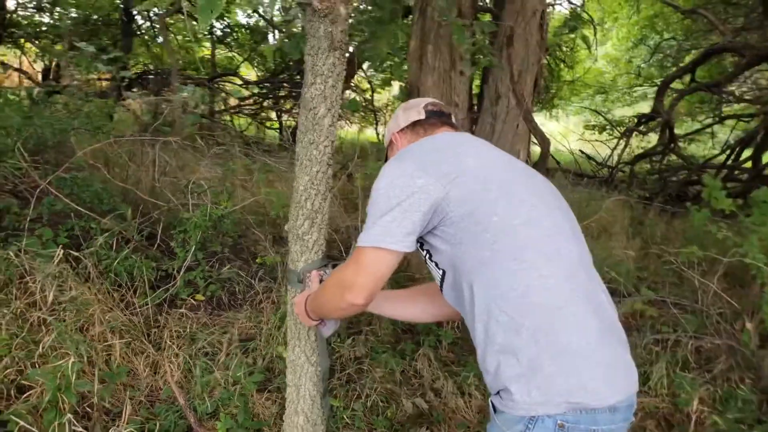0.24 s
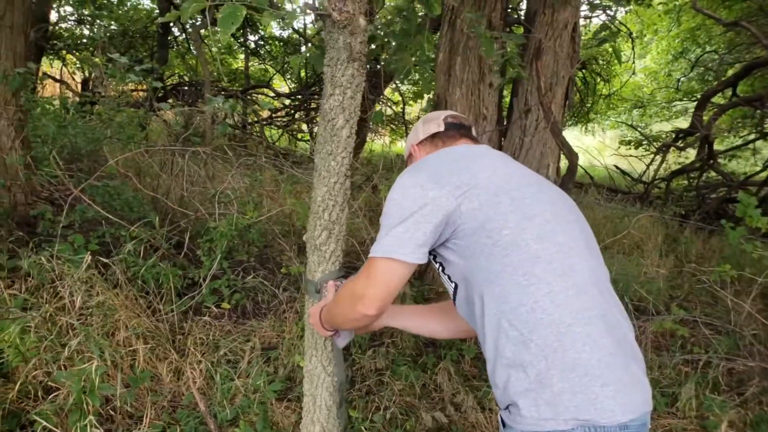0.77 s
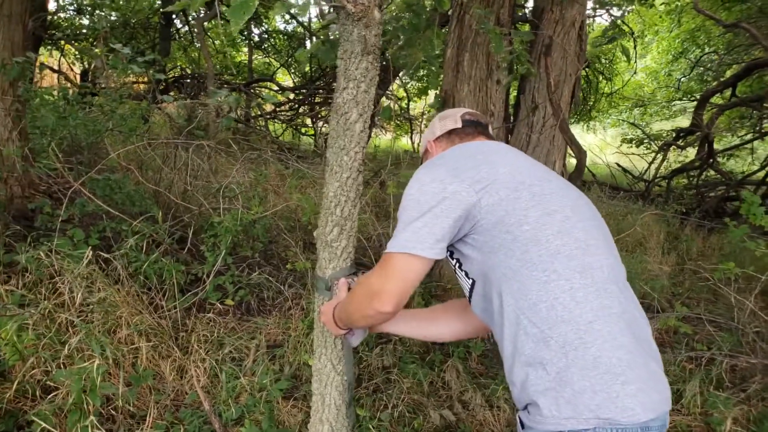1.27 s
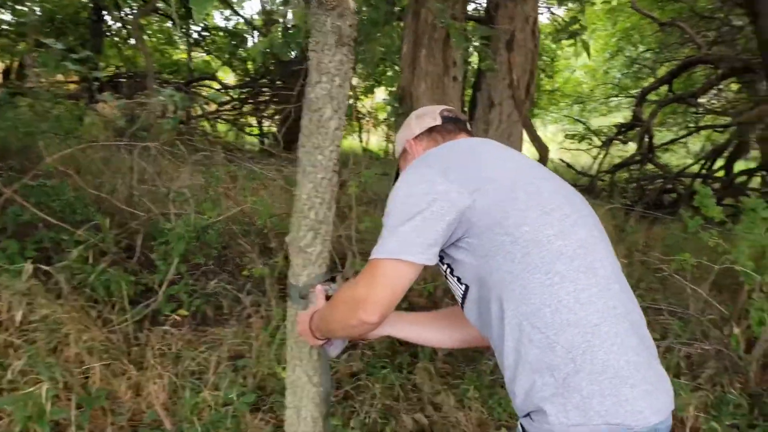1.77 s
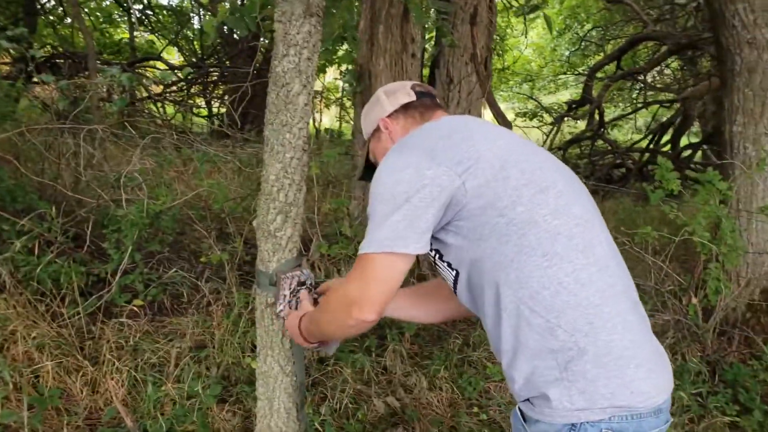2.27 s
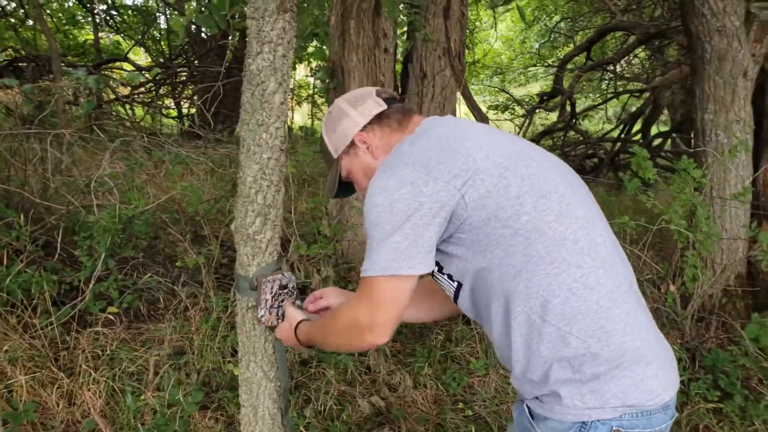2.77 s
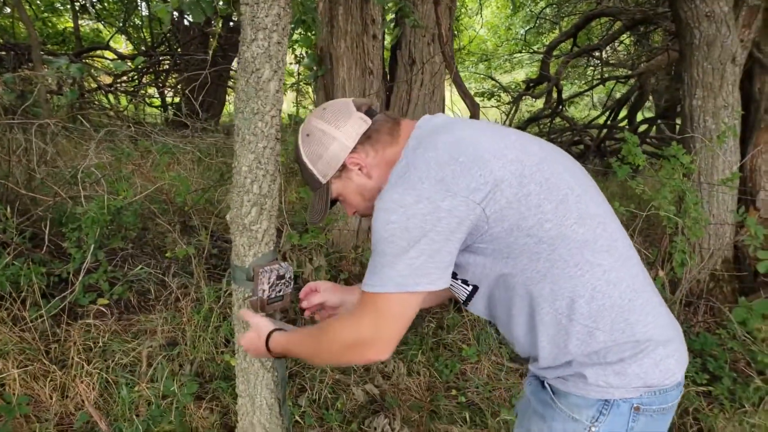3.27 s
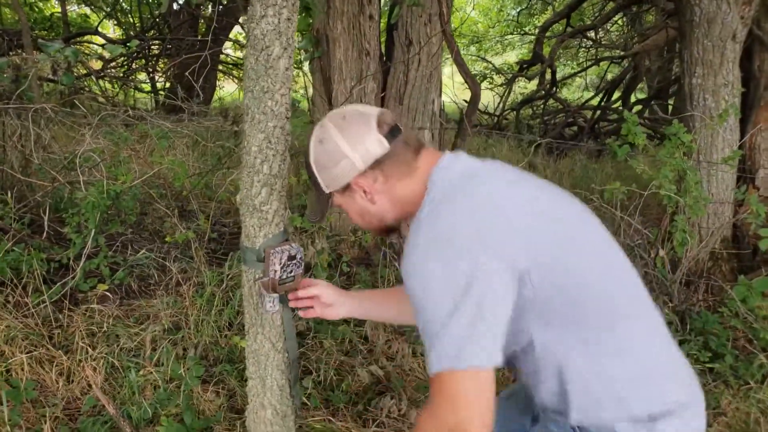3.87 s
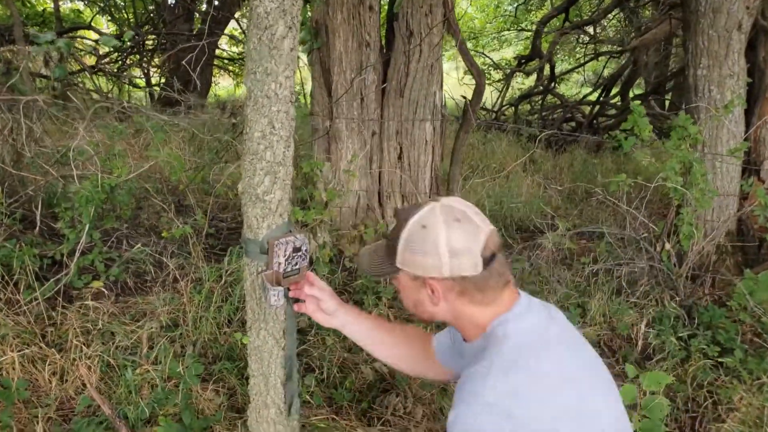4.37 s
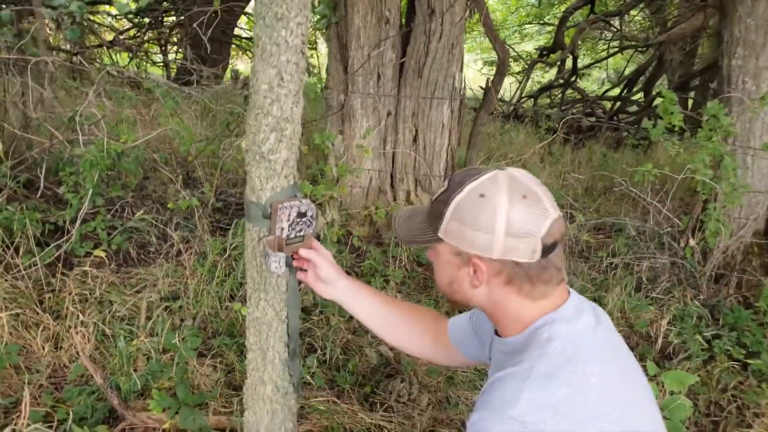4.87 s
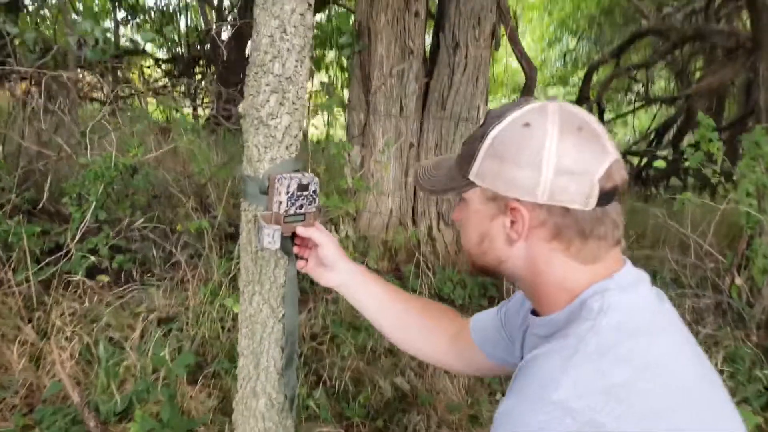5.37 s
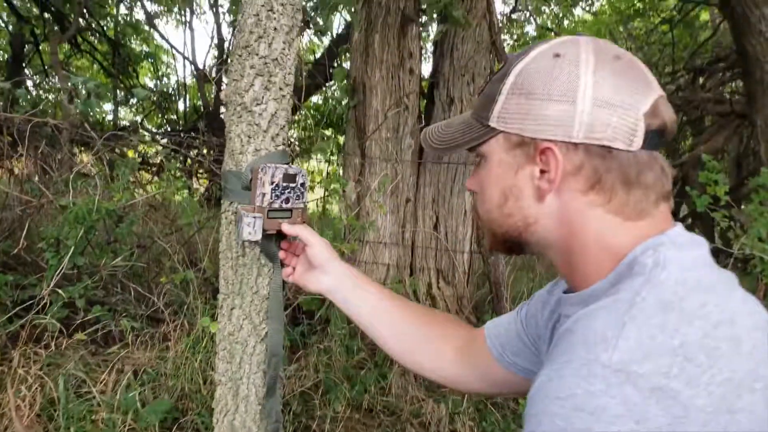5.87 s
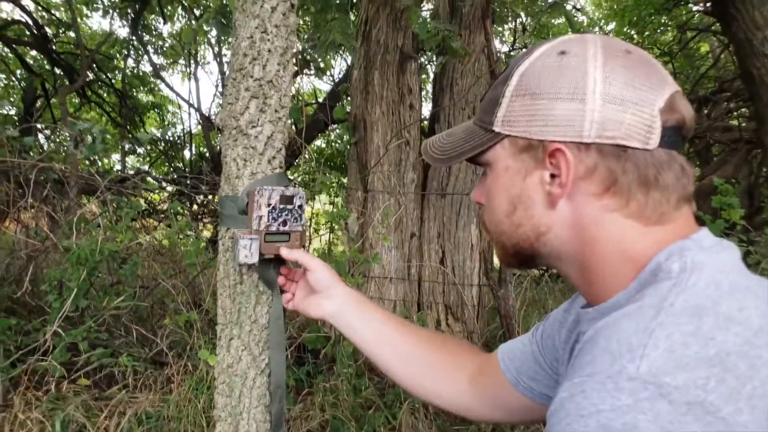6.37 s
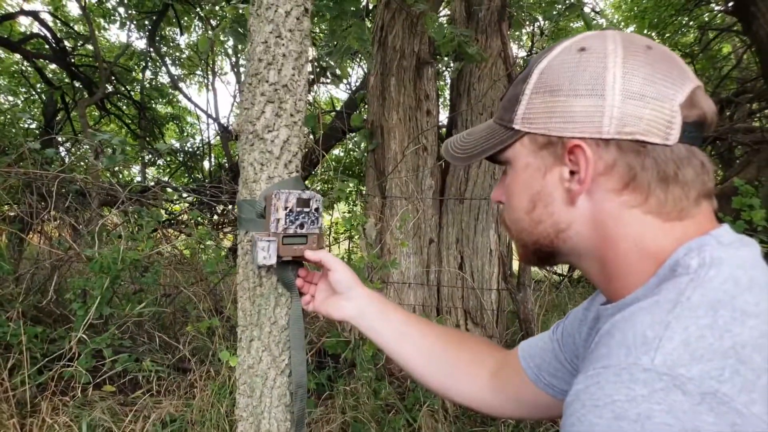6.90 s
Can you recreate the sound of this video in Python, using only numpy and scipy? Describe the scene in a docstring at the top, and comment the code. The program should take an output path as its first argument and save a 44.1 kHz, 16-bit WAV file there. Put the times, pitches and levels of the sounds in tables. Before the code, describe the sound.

Close stereo pickup in open woods. A loud, bright latch snap with a hollow plastic knock starts at once, then a smaller clack about a second later and faint ticks. Hand and cloth rub over bark, a dull step lands on soil, and dry stems crackle with snapping twigs as someone crouches. A final plastic click follows. Crickets chirp about twice a second throughout, over high insect hiss and faint low rumble.

```python
"""A latch snaps and a plastic case knocks open: a man fiddles with a trail camera strapped to a tree.
Each short click is an impulse and a dying chatter, filtered by the modes of trunk, shell and edges.
Rubbing strokes, footfalls, rustling stems and breaking twigs are filtered noise, grains and impulses
as his hand slides down the bark, he steps back and crouches in dry brush.
Crickets chirp as falling tones in the woods, under a hiss of higher insects and a faint far rumble."""
import sys
import numpy as np
from scipy import signal
from scipy.fft import rfft, irfft, next_fast_len
from scipy.io import wavfile
from scipy.ndimage import map_coordinates

SR = 44100
rng = np.random.default_rng(int(sys.argv[2]) if len(sys.argv) > 2 else 0)


def inscribe(sig):
    """Save sig as 16-bit PCM at rate SR to the path in sys.argv[1].

    A 1-D sig is mono; a 2-D sig holds one channel per row.
    Samples are clipped to [-1, 1] before scaling.
    """
    pcm = np.round(np.clip(np.atleast_2d(sig).T, -1, 1) * 32767)
    wavfile.write(sys.argv[1], SR, pcm.astype(np.int16))


N = 314874
TIME_S = np.arange(N) / SR


def amp(db):
    """Decibel law: 20 dB is a factor of ten in amplitude."""
    return 10 ** (np.asarray(db) / 20)


def unit(x):
    """Normalisation to an rms of 1."""
    return x / np.sqrt(np.mean(x ** 2) + 1e-20)


def pan(left_db):
    """Interaural level difference: left and right gains that differ by left_db."""
    return amp([[left_db / 2], [-left_db / 2]])


def along(points, hz):
    """Interpolation of (Hz, value) points on a logarithmic frequency axis."""
    point_hz, value = np.transpose(points)
    return np.interp(np.log(hz + 1), np.log(point_hz), value)


def curves(rows):
    """Interpolation in time: one curve for each column after the time."""
    s, *columns = np.transpose(rows)
    return [np.interp(TIME_S, s, column) for column in columns]


def wobble(rate):
    """Slow random modulation: a smooth curve through rate random knots a second."""
    knots = rng.standard_normal(int(N * rate / SR) + 4)
    return map_coordinates(knots, [np.arange(N) * rate / SR])


def filtered(x, response):
    """Linear filtering: the spectrum times a complex response of frequency."""
    n = x.shape[-1]
    padded = next_fast_len(n + SR // 10)
    spectrum = rfft(x, padded) * response(np.fft.rfftfreq(padded, 1 / SR))
    return irfft(spectrum, padded)[..., :n]


def resonances(modes, f):
    """Modal superposition: causal resonators (Hz, width Hz, dB) summed with alternating sign."""
    total = 0
    for k, (centre, width, db) in enumerate(modes):
        damping = 1j * f * width
        total = total + (-1) ** k * amp(db) * damping / (centre * centre - f * f + damping)
    return total


def coloured(pair, spectrum, alike):
    """Partial coherence: mixing two unrelated signals as mid and side sets the left-right likeness."""
    def response(hz):
        turn = np.arccos(np.clip(along(alike, hz), -1, 1)) / 2
        return amp(along(spectrum, hz)) * [np.cos(turn), np.sin(turn)]
    mid, side = filtered(pair, response)
    return unit(np.array([mid + side, mid - side]))


def crackle(rate, spread_db, smooth):
    """Fracture noise: random bursts of uneven size, decaying over a millisecond, on steady friction."""
    sizes = amp(spread_db * np.minimum(rng.exponential(size=N), np.pi))
    sizes = sizes * (rng.random(N) < rate / SR)
    bursts = signal.lfilter([1], [1, -np.exp(-1000 / SR)], sizes)
    return (unit(bursts) + smooth) * rng.standard_normal((2, N))


# Decay of the diffuse tail among trunks and leaves: pitch_hz, t60_s
WOODS_DECAY = [(200, 0.098), (2000, 0.42), (12000, 0.024)]


def woods(x):
    """Diffuse reverberation: trunks and leaves scatter a sound into a short tail."""
    hz, t, z = signal.stft(rng.standard_normal((2, SR // 2)), SR, nperseg=256)
    decay = amp(-60 * t / along(WOODS_DECAY, hz)[:, None])
    tail = signal.istft(z * decay, SR, nperseg=256)[1]
    return signal.fftconvolve(np.atleast_2d(x), tail / np.linalg.norm(tail[0]), axes=1)[:, :N]


def through_brush(x):
    """Multipath: stems and leaves add 18 early copies that blur a sound differently on each side."""
    delays_s = 0.026 * rng.random((2, 18, 1)) ** 1.5
    signs = rng.choice([-1, 1], (2, 18, 1))
    taps = (0.17 * signs * (np.arange(SR // 20) == np.round(delays_s * SR))).sum(1)
    taps[:, 0] += 1  # the direct path
    taps = taps / np.linalg.norm(taps, axis=1, keepdims=True)
    return signal.fftconvolve(x[None], taps, axes=1)[:, :N]


def contact(t60, chatter, apart):
    """Impact excitation: an impulse, then a dying chatter of loose parts; apart unlinks the two sides."""
    t = np.arange(SR // 10) / SR
    noise = rng.standard_normal(len(t)) + apart * rng.standard_normal((2, len(t)))
    noise *= amp(-60 * t / t60)
    return (t == 0) + chatter * t60 * noise


def at_level(x, db):
    """Onset level: scale a click so that its first 5 ms have this rms."""
    return amp(db) * x / np.sqrt(np.mean(x[:, :SR // 200] ** 2))


NOTE_S = 0.03  # one wing stroke
PULSE_CLIMB = 0.004  # share by which the mean starting pitch rises from pulse to pulse


def chirping(chirps, pulses):
    """Stridulation: every wing stroke is a short tone that falls in pitch as the wings slow down."""
    out = np.zeros(N + 2 * SR)
    u = np.arange(int(NOTE_S * SR)) / (NOTE_S * SR)
    places = np.arange(len(pulses)) - (len(pulses) - 1) / 2  # counted from the middle of the chirp
    for s, hz, db, spacing, fall in chirps:
        for k, pulse_db in zip(places, pulses):
            detune, size = rng.standard_normal(2)
            pitch = hz * (1 + PULSE_CLIMB * k + 0.0014 * detune - fall * u ** 1.64)
            tone = np.sqrt(2) * np.sin(np.pi * u) * np.sin(2 * np.pi * np.cumsum(pitch) / SR)
            start = SR + int((s + k * spacing - NOTE_S / 2) * SR)
            out[start:][:len(u)] += amp(db + pulse_db + 1.2 * size) * tone
    return out[SR:SR + N]


# Katydid level over time: time_s, relative_level_db
KATYDID_LEVEL = [(0.15, -61), (0.36, -62), (1.06, -58.5), (1.3, -55.5), (2.17, -61), (4.61, -59),
                 (4.94, -56.5), (7.14, -63.5)]
# Katydid spectrum: pitch_hz, relative_density_db_per_hz
KATYDID_COLOUR = [(8800, -14.5), (9900, -6.5), (10800, 2.5), (12500, 4), (13900, 2), (15600, 2)]
# Far, blended insects as humps of hiss: centre_hz, width_hz, relative_level_db
FAR_INSECT_HUMPS = [(4300, 1300, -5), (5590, 445, -4), (7580, 1100, 0.5), (8350, 74, -9.5)]


def insects(katydid_db=4.0, far_db=-61):
    """Band-limited noise: rasping katydids that swell and sink, over blended trills far away."""
    rasp = coloured(crackle(5000, 2.9, smooth=0.86), KATYDID_COLOUR, [(10000, 0.017)])
    katydids = amp(curves(KATYDID_LEVEL)[0] + katydid_db + 1.6 * wobble(3.4)) * rasp

    def humps(f):
        return sum(amp(db) * np.exp(-2 * ((f - hz) / width) ** 2) for hz, width, db in FAR_INSECT_HUMPS)
    trills = unit(filtered(rng.standard_normal((2, N)), humps))
    far = amp(far_db + 1.48 * wobble(25)) * trills
    return katydids * pan(-0.84) + far * pan(-0.68)


# Spectrum of the hush: pitch_hz, relative_density_db_per_hz
HUSH_COLOUR = [(25, -20), (65, -0.5), (103, 3.5), (150, -8.5), (250, -11.5), (600, -12.5), (3000, -17),
               (9000, -34.5), (16000, -37)]
# Coherence of the hush: pitch_hz, left_right_likeness
HUSH_ALIKE = [(40, 0.29), (120, 0.93), (600, 0.045), (3000, 0.086)]
# Soft low buffets: centre_s, level_db, half_length_s
BUFFETS = [(1.692, -63, 0.016), (4.437, -72, 0.14), (5.02, -66.5, 0.072), (5.476, -68.5, 0.089),
           (6.055, -73, 0.062)]
HUSH_WAVER_DB = 1.8
RUMBLE_DB = -80.5  # floor under the buffets


def air(db=-71.0):
    """Broadband and low-frequency noise: the wavering hush of leaves, a faint rumble and soft buffets."""
    hush = coloured(rng.standard_normal((2, N)), HUSH_COLOUR, HUSH_ALIKE)
    hush = amp(db + HUSH_WAVER_DB * wobble(5.1)) * hush
    low_colour = [(25, -2.5), (50, 0.0), (90, -6.0), (200, -17.0), (600, -79.0)]  # Hz, relative dB per Hz
    low = coloured(rng.standard_normal((2, N)), low_colour, [(50, 0.43)])
    swells = sum(amp(level) * np.exp(-((TIME_S - s) / half) ** 2) for s, level, half in BUFFETS)
    return hush + (amp(RUMBLE_DB) + swells) * amp(1.0 * wobble(7.7)) * low


CROWD_LOW_HZ, CROWD_SPAN_HZ = 4100, 850
CROWD_SWELL_DB, CROWD_SWELL_S = 6, 0.12


def crowd(db=-66, count=260):
    """Incoherent superposition: far crickets blur into a buzz that swells around each leader call."""
    when, pitch, size, pace = rng.random((4, count))
    s = (np.arange(count) + when) / count * N / SR
    hz = CROWD_LOW_HZ + CROWD_SPAN_HZ * (pitch + rng.random(count)) / 2
    song = chirping(np.transpose([s, hz, 5 * size, 0.04 + 0.02 * pace, 0.06 * size]), OTHER_PULSES)
    swell = sum(np.exp(-((TIME_S - call) / CROWD_SWELL_S) ** 2) for call, *_ in LEADER)
    buzz = unit(woods(song) / 2 + through_brush(song))
    return amp(db + CROWD_SWELL_DB * swell) * buzz * pan(-8)


# Short hard clicks, case contacts and some dry snaps as he crouches: start_s, knock_level_db,
# knock_centre_hz, shell_level_db, shell_centre_hz, shell_bandwidth_per_centre (ratio), tick_level_db
CLICKS = [(0.0058, -31.5, 797, -25.5, 2580, 2.4, -20.5), (0.0101, -48, 810, -50, 3000, 2.9, -46),
          (0.0192, -46.5, 636, -24.5, 2240, 0.82, -22.5), (0.073, -55, 710, -30.5, 4100, 0.32, -58),
          (0.1073, -50, 760, -45, 2200, 0.76, -56), (1.185, -42.5, 1320, -38, 2200, 0.33, -48),
          (1.2022, -37.5, 1300, -36, 2300, 1.7, -46), (1.203, -46.5, 596, -40, 2020, 1.3, -54),
          (1.2052, -54, 290, -32, 2680, 1.1, -45), (1.213, -47, 1300, -47, 1800, 0.82, -62),
          (1.398, -62.5, 447, -32.5, 3050, 2.8, -34.5), (1.4921, -66, 403, -43, 3260, 0.57, -48),
          (1.56, -71, 500, -56, 1880, 2.1, -49), (1.633, -71, 704, -60, 1520, 0.51, -64),
          (1.65, -53.5, 820, -44, 3360, 2.4, -50), (1.658, -64, 756, -57, 1590, 1.3, -61),
          (1.742, -57.5, 850, -51.5, 2300, 1.4, -66), (1.8728, -69, 550, -50.5, 2440, 1.1, -65),
          (1.9504, -56, 750, -45.5, 2410, 0.94, -54), (1.973, -70, 700, -49.5, 3180, 1.1, -62),
          (2.243, -72, 795, -66.5, 1800, 0.7, -72), (2.677, -77, 550, -52, 2120, 0.71, -70),
          (2.9288, -78, 990, -50.5, 4520, 1.9, -58), (4.764, -79, 950, -42.5, 3880, 1.3, -42),
          (4.7967, -90, 746, -39.5, 3020, 1.1, -42), (4.842, -87, 950, -29, 3750, 0.71, -41.5),
          (4.8402, -88, 500, -40.5, 2110, 0.13, -35), (5.8545, -81, 448, -26, 3880, 1.05, -71),
          (6.2444, -73, 496, -43, 1950, 0.34, -53), (6.25, -85, 800, -45, 3000, 1.1, -47),
          (6.2579, -47.5, 1010, -28, 2300, 1.6, -39), (6.2775, -72, 800, -53, 3500, 1.3, -47),
          (6.2883, -60, 1040, -44, 3800, 0.69, -37), (6.473, -67.5, 810, -70, 1500, 1, -72),
          (6.503, -79, 750, -52.5, 3000, 2.2, -74)]
# Modes of the case: centre_hz, width_hz, gain_db
CASE = [(1036, 73.5, -26), (1372, 240, 8.5), (1950, 460, -2.5), (2300, 304, -11.5), (3000, 120, -8.5),
        (4020, 59, -36), (3880, 950, 8.5), (4860, 450, 17), (5490, 1000, 5.5)]
# Modes of the case knocking against the trunk: centre_hz, width_hz, gain_db
KNOCK = [(296, 41, 20.5), (633, 100, 13), (820, 180, 8.5), (1023, 260, 11), (1306, 74, 17)]
# Modes of the small hard edges of latch and switches: centre_hz, width_hz, gain_db
EDGES = [(8230, 1600, 0.5), (10680, 520, 5.5), (12340, 1900, 8), (15900, 870, -19)]
LONGEST_RING_S = 0.04  # the hand damps the case
RING_CYCLES = 77.4  # the chatter dies by 60 dB within this many cycles of its shell centre


def clicks(plate=1.0, lag_ms=0.11):
    """Impact on modes: every click, dry snaps too, sums a trunk knock, a shell ring and an edge tick."""
    out = np.zeros((2, N + SR))
    for s, knock_db, knock_hz, shell_db, hz, breadth, tick_db in CLICKS:
        t60 = min(RING_CYCLES / hz, LONGEST_RING_S)

        def shell_modes(f):
            return (plate + resonances(CASE, f)) * resonances([(hz, breadth * hz, 0)], f) ** 2

        def knock_modes(f):
            return resonances(KNOCK, f) * resonances([(knock_hz, knock_hz / 2, 0)], f) ** 2
        shell = filtered(contact(t60, chatter=2.5, apart=1), shell_modes)
        knock = filtered(contact(t60, chatter=1.2, apart=0)[:1], knock_modes)
        tick = filtered(contact(t60, chatter=2.2, apart=1.8), lambda f: resonances(EDGES, f))
        click = at_level(knock, knock_db) + at_level(shell, shell_db) * pan(-2.5)
        click = click + at_level(tick, tick_db) * pan(1.57)
        out[:, int(s * SR):][:, :click.shape[1]] += click
    # half the lag delays the left and half advances the right, so the right hears it first
    sides = np.array([[1], [-1]])
    return filtered(out[:, :N], lambda f: np.exp(-1j * np.pi * f * lag_ms / 1000 * sides))


# The shiver after the first snap, one row: start_s, level_db, t60_s
SHIVER = (0.0095, -26.5, 0.28)
# Spectrum of the shiver: pitch_hz, relative_density_db_per_hz
SHIVER_COLOUR = [(88, -39), (170, -15), (450, -3), (796, -5), (1220, -9.5), (1570, -0.5), (2060, -8),
                 (4650, -0.5), (5330, -2), (9540, -4.5), (10900, -2), (15500, -1.5)]
# Tones of the latch: pitch_hz, peak_level_db, t60_s
LATCH_RING = [(848, -29, 0.072), (1005, -41.5, 0.1)]
# Coherence of nearby sounds, shared with brush and rubbing: pitch_hz, left_right_likeness
NEAR_ALIKE = [(200, 0.99), (1200, 0.253), (3000, 0.0394), (7000, 0.18)]


def shiver():
    """Exponential decay: the first hard snap rings the latch and leaves a bright, quickly dying hiss."""
    s, db, t60 = SHIVER
    age = TIME_S - s
    hiss = coloured(rng.standard_normal((2, N)), SHIVER_COLOUR, NEAR_ALIKE)
    hiss = amp(db - 60 * np.abs(age) / t60) * hiss * pan(0.87)
    ring = sum(amp(level - 60 * np.abs(age) / life) * np.sin(2 * np.pi * hz * age)
               for hz, level, life in LATCH_RING)
    return (age > 0) * (hiss + ring)


# Nearest cricket, calling about twice a second: chirp_middle_s, relative_level_db, pitch_hz (at the
# start of a pulse), pitch_fall (share over a pulse)
LEADER = [(0.109, -55, 4920, 0.061), (0.552, -57.5, 4940, 0.061), (1.116, -55.5, 4920, 0.046),
          (1.515, -53, 4930, 0.042), (1.975, -57.5, 4900, 0.034), (2.438, -54.5, 4940, 0.049),
          (2.947, -56, 4920, 0.02), (3.425, -54, 4930, 0.046), (3.904, -52.5, 4900, 0.031),
          (4.421, -57, 4940, 0.059), (4.859, -58, 4900, 0.056), (5.361, -60, 4890, 0.017),
          (5.77, -58, 4890, 0.027), (6.147, -53.5, 4890, 0.017), (6.589, -54, 4880, 0.008),
          (7.027, -53.5, 4900, 0.0071)]
# Neighbours chirping around each of its chirps: pitch_hz (mean start), relative_level_db (mean),
# offset_s (mean, negative is earlier)
NEIGHBOURS = [(4830, -75.5, 0.01), (4720, -71, -0.01), (4370, -70.5, -0.08), (4220, -68.5, 0.04),
              (4010, -70, 0.046)]
# Quicker, nearly level chirps out of step with them: chirp_middle_s, pitch_hz, relative_level_db
STRAYS = [(0.25, 4270, -66.5), (0.834, 4260, -71), (1.8, 4820, -69), (2, 4230, -66), (2.349, 4400, -72),
          (2.54, 4210, -83), (2.73, 4820, -70.5), (2.822, 4380, -70), (3.331, 4230, -63.5),
          (3.522, 4220, -64), (3.68, 4810, -65.5), (4.07, 4255, -65), (4.32, 4170, -62), (4.36, 4560, -63),
          (4.65, 4830, -67), (4.68, 4260, -64), (5.532, 4330, -67), (6.3, 4275, -61), (6.51, 4845, -65.5),
          (6.669, 4200, -67), (6.859, 4840, -66)]
NEIGHBOUR_PULSE_S, NEIGHBOUR_FALL = 0.05, 0.051  # mean pulse spacing, share of pitch lost
NEIGHBOUR_SCATTER_S, NEIGHBOUR_SCATTER_DB = 0.025, 1.5
STRAY_PULSE_S, STRAY_FALL = 0.033, 0.023


def other_chirps():
    """Loose synchrony: neighbours chirp around each leader call, while strays keep their own time."""
    chirps = []
    for s, *_ in LEADER:
        for hz, db, offset in NEIGHBOURS:
            slip, size, detune, pace = rng.standard_normal(4)
            middle = s + offset + NEIGHBOUR_SCATTER_S * slip
            level = db + NEIGHBOUR_SCATTER_DB * size
            spacing = NEIGHBOUR_PULSE_S * (1 + 0.12 * pace)
            chirps.append((middle, hz * (1 + 0.006 * detune), level, spacing, NEIGHBOUR_FALL))
    return chirps + [(s, hz, db, STRAY_PULSE_S, STRAY_FALL) for s, hz, db in STRAYS]


# Successive pulses of a leader chirp: relative_level_db
LEADER_PULSES = [-1.5, 0.69, 0]
# Successive pulses of every other chirp, near or far: relative_level_db
OTHER_PULSES = [1, 6.5, 8.5, 7.5]
LEADER_PULSE_S = 0.0535  # time from pulse to pulse


def crickets(direct_db=-2.1):
    """Direct and scattered sound: near crickets chirp through the brush and the trees smear their pulses."""
    calls = [(s, hz, db, LEADER_PULSE_S, fall) for s, db, hz, fall in LEADER]
    leader = chirping(calls, LEADER_PULSES)
    others = chirping(other_chirps(), OTHER_PULSES)
    direct = amp(direct_db) * through_brush(leader + others)
    scattered = woods(amp(-11) * leader + amp(-9) * others)
    return (direct + scattered) * pan(-1.3)


def splinters(count=9000, hz=2700, cycles=12):
    """Granular fracture: fine stems break at random moments, each with its own size, side and brief pitch."""
    when, size, side = rng.random((3, count, 1))
    pitch = np.clip(hz * np.exp(0.4 * rng.standard_normal((count, 1))), 800, 9000)
    k = np.arange(SR // 100)
    turns = pitch * k / SR
    grains = pitch * amp(15 * size ** 4 - 60 * turns / cycles) * np.sin(2 * np.pi * turns)
    where = ((when * N).astype(int) + k).ravel()
    sides = [np.bincount(where, (gain * grains).ravel(), N)[:N] for gain in (side, 1 - side)]
    return unit(np.array(sides))


# Shifts of his weight: peak_s, relative_level_db, rise_s, settling_db_per_s
SHIFTS = [(0.62, -74.5, 0.047, 27), (0.74, -69, 0.2, 64), (1.29, -65, 0.21, 31), (1.99, -73, 0.28, 113),
          (3.8, -67.5, 0.028, 30), (4.57, -69.5, 0.19, 15), (4.96, -64, 0.1, 4.5)]
# Spectrum of the dry stems: pitch_hz, relative_density_db_per_hz
LEAVES = [(88, -49), (150, -40), (722, -13.5), (844, -21), (2920, 2), (4650, -4.5), (6230, -11),
          (7560, -15), (9180, -5), (12300, -50), (15500, -39)]
SETTLED_S, STILL_DB_PER_S = 5.88, 60  # once he is down in the crouch the stems come to rest
UNEVEN_DB = 2.2  # level flutter of the rustle, and of a fully rough rubbing stroke


def brush(rustle_db=8.0):
    """Friction and fracture: dry stems crackle as each shift of his weight builds up, then settle."""
    rustle = coloured(crackle(600, 2.5, smooth=1.8), LEAVES, NEAR_ALIKE)
    stems = unit(rustle + amp(-0.5) * splinters())
    shifts = []
    for s, db, rise, settling in SHIFTS:
        decay = amp(db - settling * np.maximum(TIME_S - s, 0))
        shifts.append(decay * np.exp(-(np.minimum(TIME_S - s, 0) / rise) ** 2))
    resting_db = -STILL_DB_PER_S * np.maximum(TIME_S - SETTLED_S, 0)
    level = amp(rustle_db + resting_db + UNEVEN_DB * wobble(25))
    return np.linalg.norm(shifts, axis=0) * level * stems * pan(-2.8)  # shifts add in power


# Rubbing strokes: start_s, length_s, level_db, centre_hz, resonance_db, treble_db (limit of a
# high shelf), roughness (0-1)
STROKES = [(1.199, 0.089, -50.5, 2620, -14, -16, 0.5), (3.24, 0.21, -46.5, 1660, -1, 2.5, 0.08),
           (3.338, 0.088, -52.5, 2000, -10, 20, 0.3), (3.6, 0.27, -51.5, 1960, 17, 3, 0.2),
           (4.843, 0.11, -52, 3000, -10, -4, 0.4), (5.149, 0.074, -48.5, 2200, 18, -11, 0.2)]
# Spectrum of a rub before its treble shelf: pitch_hz, relative_density_db_per_hz
RUB = [(200, -18.5), (900, -9), (1400, 1.5), (3000, 4.5), (6000, -2.5), (9500, -3.5), (12000, 3),
       (15500, -6)]


def rubbing():
    """Stick-slip friction: hand and clothes slide over bark and strap; rough strokes catch and crackle."""
    out = np.zeros((2, N))
    for s, length, db, hz, focus_db, treble_db, rough in STROKES:
        swell = np.abs(np.sin(np.pi * np.clip((TIME_S - s) / length, 0, 1))) ** 1.3
        spectrum = [(f, level + treble_db * f / (f + 4000)) for f, level in RUB]
        grains = coloured(crackle(1100, 3, smooth=3 * (1 - rough) ** 2), spectrum, NEAR_ALIKE)
        rub = unit(filtered(grains, lambda f: 7.5 + resonances([(hz, hz / 4, focus_db)], f)))
        out += amp(db + rough * UNEVEN_DB * wobble(90)) * swell * rub
    return out * pan(-0.79)


# Heel and sole landing, then pressing in for the crouch: start_s, level_db, dull_above_hz
STEP = [(3.7796, -57.5, 330), (3.793, -50, 900), (3.8029, -50, 700), (3.822, -56.5, 1200),
        (4.904, -68, 1200), (4.943, -61, 1500), (5.02, -72, 1000)]
# Modes of the soil under the foot: centre_hz, width_hz, gain_db
SOIL = [(121, 64, -1), (210, 110, 1.5), (327, 73, 7), (576, 96, 1), (810, 61, 11.5), (2200, 13000, -7)]


def footfall(drag_db=-69, drag_hz=300):
    """Damped impact: the shoe drags briefly, then heel and sole thud on soil with a set treble cutoff."""
    def ground(x, hz):
        return filtered(x, lambda f: resonances(SOIL, f) / (1 + 1j * f / hz) ** 2)
    drag = np.exp(-((TIME_S - STEP[0][0] + 0.059) / 0.095) ** 2)  # centred before the first landing
    out = amp(drag_db) * drag * unit(ground(rng.standard_normal((1, N)), drag_hz))
    for s, db, hz in STEP:
        thud = at_level(ground(contact(0.05, chatter=2, apart=0)[:1], hz), db)
        out[:, int(s * SR):][:, :thud.shape[1]] += thud
    return out * pan(-2.3)


# Twigs that snap as he crouches, the thick ones lowest: start_s, level_db, pitch_hz
TWIGS = [(4.4197, -57, 3000), (4.726, -57, 1050), (4.88, -52, 3320), (4.927, -67, 1020), (4.946, -53, 2380),
         (4.9909, -37.5, 2900), (5.0687, -50, 3500), (5.069, -57, 980), (5.091, -58.5, 664),
         (5.109, -54, 2990), (5.156, -46, 2080), (5.187, -66, 1710), (5.213, -51.5, 4300),
         (5.288, -50, 3000), (5.3541, -44, 1840), (5.457, -57, 1950), (5.544, -52.5, 4080),
         (5.6633, -47.5, 3880), (5.711, -63.5, 4220), (5.763, -59, 4200), (5.939, -55.5, 3370)]
TWIG_RING_S = 0.014  # t60 of the chatter


def twigs(breadth=0.42, crack=0.074):
    """Brittle fracture: a dry twig breaks with one crack and rings briefly at a pitch of its own."""
    out = np.zeros((2, N + SR))
    for s, db, hz in TWIGS:
        def wood(f):
            return resonances([(hz, breadth * hz, 0)], f) ** 2 + crack * f / (f + hz)
        snap = at_level(filtered(contact(TWIG_RING_S, chatter=5.9, apart=1.0), wood), db)
        out[:, int(s * SR):][:, :snap.shape[1]] += snap
    return out[:, :N] * pan(-4.5)


def scene():
    """Superposition: clicks and snaps echo among the trunks, over rustles, insects and air."""
    sharp = clicks() + twigs()
    echo = amp(-23) * woods(sharp)
    handling = sharp + echo + shiver() + rubbing()
    movement = brush() + footfall()
    return handling + movement + crickets() + crowd() + insects() + air()


TOP_HZ = 15900  # band limit


def record(dry):
    """Low-pass filtering: a very steep cutoff removes what lies above the band limit."""
    return filtered(dry, lambda hz: 1 / (1 + (hz / TOP_HZ) ** 200))


dry = scene()
out = record(dry)
inscribe(out)
```